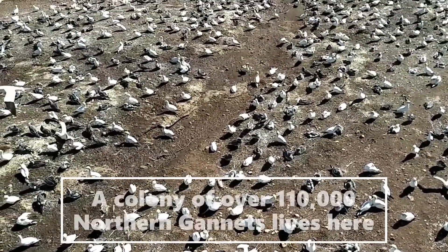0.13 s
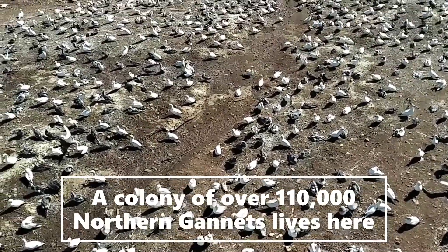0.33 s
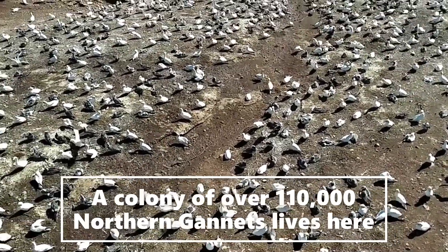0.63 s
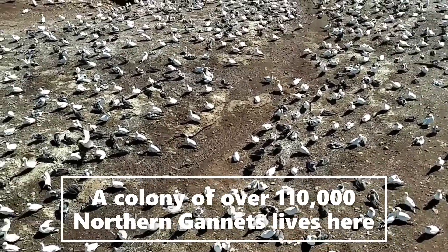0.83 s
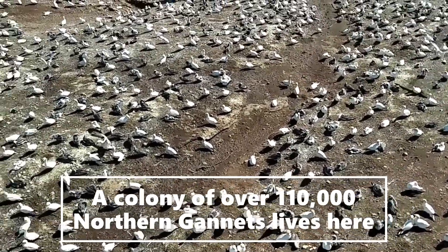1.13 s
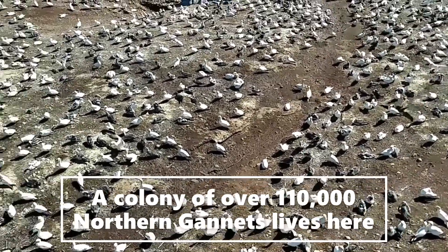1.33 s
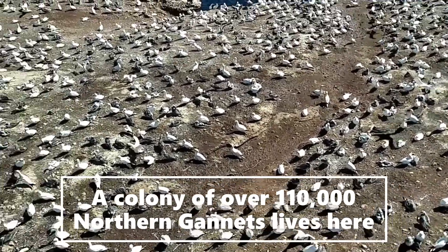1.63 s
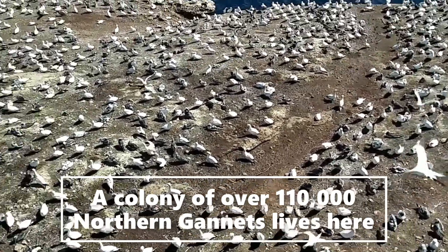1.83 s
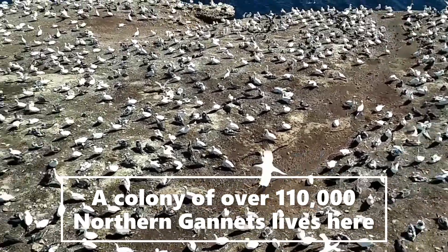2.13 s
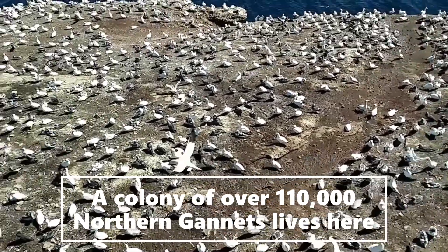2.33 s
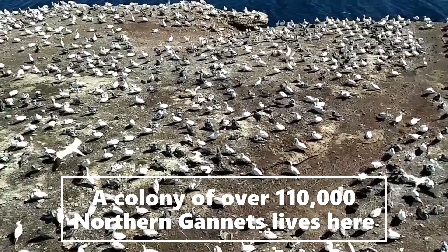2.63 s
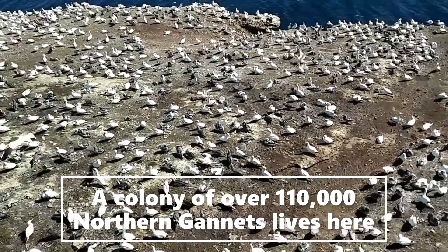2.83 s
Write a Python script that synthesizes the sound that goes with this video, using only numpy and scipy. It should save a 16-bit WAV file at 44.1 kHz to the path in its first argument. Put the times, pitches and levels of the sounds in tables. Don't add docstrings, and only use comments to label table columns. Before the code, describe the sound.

A huge seabird nesting colony calls in a dense, rasping, overlapping clamour with low wind rumble

```python
import sys
import numpy as np
from scipy import signal
from scipy.fft import rfft, irfft
from scipy.io import wavfile
from scipy.ndimage import uniform_filter1d, minimum_filter1d

SR = 44100
rng = np.random.default_rng(int(sys.argv[2]) if len(sys.argv) > 2 else 0)


def wav_record(signal):
    frames = np.transpose(np.atleast_2d(signal))
    bounded = np.clip(frames, -1, 1)
    quanta = np.round(bounded * 32767).astype(np.int16)
    wavfile.write(sys.argv[1], SR, quanta)


def ratio(d):
    e = np.asarray(d, float) / 20
    return 10 ** e


N = 131859

PITCH_HZ, ROLL_HZ, ROUGH = 410, 28.87, 0.16
UPPER_HZ = 3900

# [t/s, effort/dB, nearness of loudest callers/dB]
CROWD = [(0, -16, -17.5), (.1, -17.5, -19), (.17, -17.5, -21.5), (.58, -18, -23), (.78, -16, -21),
         (1.0, -18.5, -23.5), (1.16, -16, -19.5), (1.25, -17.5, -27.5), (1.38, -15, -23),
         (1.52, -16.5, -26), (1.66, -16, -19.5), (1.8, -17, -26.5), (2.0, -17.5, -17), (2.12, -19, -27),
         (2.23, -17, -19.5), (2.4, -19.5, -25), (2.68, -17.5, -20), (2.87, -20.5, -25)]
# [f/Hz, density/dB]
VOICE_SPECTRUM = [(480, -16.5), (940, -8), (1500, -5), (2000, 0), (2600, 0.5), (3300, -8), (4350, -14.5),
                  (5000, -32)]
# [f/Hz, density/dB]
RASP_SPECTRUM = [(2710, 4.5), (4600, 0), (5040, -0.5), (6530, -4), (9560, -14.5), (12600, -13.5),
                 (13700, -16.5), (15500, -28)]
CALLS_DB, WASH_DB, RASP_DB = -3, -2, 5.5


def colony():
    calls, rasp = callers()
    effort, near = ratio(curve(CROWD, 1)), ratio(curve(CROWD, 2))
    wash = colour(rng.standard_normal(N), VOICE_SPECTRUM)
    body = ratio(WASH_DB) * wash + ratio(CALLS_DB) * colour(calls, VOICE_SPECTRUM)
    hiss = colour(0.5 * rng.standard_normal(N) + 0.27 * rasp, RASP_SPECTRUM)
    crowd = effort * in_step() * (body + ratio(RASP_DB) * near * hiss)
    return crowd + near_birds() + cries() + grit() + murmur()


CALL_S, CALL_SPREAD_DB = 0.22, 2.5
PITCH_SPREAD, ARCH = 0.17, 0.12
ROLL_SPREAD, ROLL_SHARP = 0.17, 2.84
THROAT_LOW_HZ, THROAT_HIGH_HZ, THROAT_WIDTH_HZ, RING_DB = 1800, 4400, 280, 7
BEAK_LOW_HZ, BEAK_HIGH_HZ, BEAK_WIDTH_HZ, BEAK_DB = 4800, 14000, 2000, -8


def callers(count=120):
    body, rasp = np.zeros(N), np.zeros(N)
    u = np.linspace(0, 1, 9700)
    arch = np.sin(np.pi * u ** 0.8)
    for k, chances in enumerate(rng.random((count, 7))):
        when, roll_u, level_u, pitch_u, throat_u, phase, beak_u = chances
        roll_hz = ROLL_HZ * (1 + ROLL_SPREAD * (2 * roll_u - 1))
        roll = abs(np.sin(np.pi * (roll_hz * u * CALL_S + phase))) ** ROLL_SHARP
        shape = arch * roll * ratio(-CALL_SPREAD_DB * np.log(1 - 0.9 * level_u))
        pitch_hz = PITCH_HZ * (1 + PITCH_SPREAD * (2 * pitch_u - 1))
        drive = voice(pitch_hz * (1 - ARCH + ARCH * arch), ROUGH)
        throat_hz = THROAT_LOW_HZ * (THROAT_HIGH_HZ / THROAT_LOW_HZ) ** throat_u
        throat = ring(drive, throat_hz, THROAT_WIDTH_HZ)
        beak_hz = BEAK_LOW_HZ + (BEAK_HIGH_HZ - BEAK_LOW_HZ) * beak_u
        beak = ring(drive, beak_hz, BEAK_WIDTH_HZ)
        s = (k + when) / count * (N / SR + CALL_S) - CALL_S
        add(body, s, shape * scattered(drive + ratio(RING_DB - 17.5) * throat))
        add(rasp, s, shape ** 4.5 * scattered(drive + ratio(BEAK_DB) * beak))
    return evened(body), evened(rasp)


def near_birds():
    tone, edge = near_throbs()
    tone = tone + pipes()
    soft = signal.butter(4, 4700, fs=SR, output="sos")
    tone = 0.2 * tone + 0.65 * signal.sosfiltfilt(soft, tone)
    return tone + squeaks() + edge


# [t/s, peak level/dB, throat f/Hz]
THROBS = [(0.043, 3, 2970), (0.191, -6, 2280), (0.2174, -0.5, 2336), (0.2918, 0, 2630), (0.3298, -7, 2570),
          (0.3589, 3.5, 2420), (0.398, 1.5, 2757), (0.4255, -1.5, 2217), (0.4531, 1.5, 2197),
          (0.4815, -3, 1870), (0.5409, -9, 2128), (0.5782, -3, 2686), (0.6172, -0.5, 2460),
          (0.6663, -2, 2680), (0.6872, 1, 2660), (0.7203, 2, 2938), (0.762, -18, 2780), (0.874, -21, 1910),
          (0.9053, -5, 2325), (0.9522, -8.5, 2470), (1.0126, -20, 2180), (1.041, 3, 2770), (1.12, -4, 2370),
          (1.1392, -13, 2440), (1.31, -19, 2050), (1.3429, -10, 2640), (1.4065, 1.5, 2016),
          (1.5489, -11, 2560), (1.5722, -15, 2650), (1.6046, -9, 2176), (1.6646, -25, 2530),
          (1.7453, 1, 2206), (1.7735, -17, 2540), (1.8125, -5, 2296), (1.8377, -20, 3400),
          (1.8896, -14, 1900), (1.9096, -10, 2224), (2.007, -13, 1890), (2.0439, -5, 3110),
          (2.0847, -13, 2540), (2.146, -10.5, 2890), (2.2039, -3, 1950), (2.264, -20, 2680),
          (2.2917, -6, 2800), (2.3266, -18, 2185), (2.397, -12, 2890), (2.4264, -15, 2130),
          (2.4592, 0.5, 2175), (2.4892, -1, 2640), (2.5302, -3, 2660), (2.56, -10, 2500),
          (2.592, -17, 2450), (2.6438, -1, 2597), (2.6732, -28, 2140), (2.768, -18, 2520),
          (2.798, -10, 2640), (2.831, -10, 1835), (2.8614, -15, 2040), (2.9023, 0, 2510), (2.9483, 3, 2620)]
NEAR_DB, UPPER_DB, EDGE_DB = -8, -9, -33
FALL_S, THROB_HOLD_S = 0.007, 0.0095


def near_throbs():
    out, edge = np.zeros((2, N))
    for s, db, hz in THROBS:
        pitch_hz = hz / round(hz / PITCH_HZ)
        drive = scattered(voice(pitch_hz * np.ones(3400), ROUGH))[400:]
        throat = ring(drive, hz, 71) + 0.64 * ring_twice(drive, 2520, 1060, 1060)
        tone = throat + ratio(UPPER_DB) * ring_twice(drive, UPPER_HZ, 470, 470)
        add(out, s, ratio(db + NEAR_DB - 8.5) * burst(FALL_S, THROB_HOLD_S) * tone)
        add(edge, s, ratio(2.3 * db) * burst(0.003, 0.004) * evened(drive))
    return out, ratio(EDGE_DB - 26) * colour(edge, RASP_SPECTRUM)


IN_STEP_DB = 2


def in_step():
    beat = np.zeros(N)
    for s, db, hz in THROBS:
        add(beat, s, burst(FALL_S, THROB_HOLD_S))
    return evened(ratio(IN_STEP_DB * np.minimum(beat, 1)))


# [t/s, peak level/dB, f/Hz]
PIPES = [(0.0144, -0.5, 3700), (0.0433, -12, 3770), (0.0747, 0.5, 3334), (0.194, -12, 3720),
         (0.2199, -6, 3810), (0.2907, -21, 3720), (0.3316, -4, 3880), (0.3636, -5, 3430),
         (0.4234, -14, 3920), (0.4509, -6, 4150), (0.5417, -12, 3670), (0.5786, -26, 3850),
         (0.6604, -7, 3280), (0.7213, -10, 3500), (0.7811, -4, 4200), (0.9028, -8, 3840), (1.073, -6, 3550),
         (1.1079, -14, 3470), (1.1383, -1.5, 3710), (1.2785, -16, 3250), (1.3104, -27, 3230),
         (1.4072, -7.5, 3760), (1.4765, 1, 3697), (1.5718, -6, 3230), (1.7379, -2.5, 3620),
         (1.8377, -3, 3404), (2.166, -9, 3580), (2.2039, -26, 3320), (2.4937, -10, 3280),
         (2.5626, -19, 3250), (2.6993, -6, 3930), (2.9392, -12, 3920)]
# [t/s, peak level/dB, f/Hz]
TOP_PIPES = [
    (1.1423, -26, 4230),
    (1.1694, -2, 4370),
    (1.4074, -3, 4300),
    (1.4344, -6, 4320),
    (1.4735, -7, 4370),
]
PIPE_HOLD_S, PIPE_DB, PIPE_WIDTH_HZ = 0.0082, -16, 50


def pipes():
    out = np.zeros(N)
    for s, db, hz in PIPES + TOP_PIPES:
        pipe = ring_twice(rng.standard_normal(3000), hz, PIPE_WIDTH_HZ, 400)
        add(out, s, ratio(db + PIPE_DB) * burst(0.012, PIPE_HOLD_S) * pipe)
    return out


# [t/s, peak level/dB, f/Hz]
SQUEAKS = [(0.0468, -39, 11600), (0.156, -27, 12900), (0.3311, -24, 13600), (0.3626, -25, 11600),
           (0.587, -18, 12200), (0.8205, -22, 12100), (1.0665, -27, 12400), (1.1408, -35.5, 12400),
           (1.3733, -26, 12700), (1.5618, -27, 10000), (1.67, -25, 13000), (1.7415, -22, 12600),
           (1.748, -20, 8500), (2.008, -24, 10500), (2.018, -23, 11500), (.666, -23, 9100),
           (1.9385, -19, 10300), (1.9719, -22, 11200), (2.1665, -26, 11900), (2.2029, -22, 12200),
           (2.9597, -26, 12500)]
PUFF_DB = -3


def squeaks():
    out = np.zeros(N)
    for s, db, hz in SQUEAKS:
        puff = ring_twice(rng.standard_normal(3000), hz, 2400, 2400)
        add(out, s, ratio(db + PUFF_DB - 11) * burst(0.0041, 0.0021) * puff)
    return out


# [t/s, length/s, level/dB, pitch f/Hz]
CRIES = [(0, 0.038, -14.5, 438), (.04, 0.096, -17, 432.5), (.21, 0.082, -15, 443), (.4, 0.097, -16, 388.6),
         (.74, 0.095, -16.5, 409.3), (.86, .12, -20.5, 364.7), (1.07, 0.15, -16, 411),
         (1.39, 0.12, -25, 403), (1.56, .1, -23.5, 394), (1.66, 0.086, -16, 399.5),
         (1.88, 0.108, -19.5, 409.4), (2.0, .07, -22.5, 384.3), (2.2, .12, -18.5, 417),
         (2.66, .13, -17, 417), (2.96, 0.041, -18, 438)]
SAG, CRY_ROUGH, CRY_ROLL = 0.08, 0.1, 0.6


def cries():
    out = np.zeros(N)
    for s, length_s, db, hz in CRIES:
        u = np.linspace(0, 1, round(length_s * SR))
        roll = 1 - CRY_ROLL * np.cos(np.pi * ROLL_HZ * u * length_s) ** 2
        shape = abs(np.sin(np.pi * u)) ** 0.21 * roll
        add(out, s, ratio(db) * shape * scattered(voice(hz * (1 + SAG * (0.5 - u)), CRY_ROUGH)))
    level = np.std(out)
    return level * colour(out + 0.88 * level * ring(out, UPPER_HZ, 1140), VOICE_SPECTRUM)


GRIT_PER_S, GRIT_DB = 680, -44.5


def grit():
    clumps = np.maximum(evened(uniform_filter1d(rng.standard_normal(N), size=1200)), 0) ** 2
    size_db = 6.3 * np.minimum(rng.exponential(1, N), 4)
    ticks = (rng.random(N) < clumps * GRIT_PER_S / SR) * ratio(size_db)
    return ratio(GRIT_DB) * colour(scattered(ticks), RASP_SPECTRUM)


MURMUR_HZ, MURMUR_DB = 399, -40.5


def murmur():
    return ratio(MURMUR_DB) * ring_twice(rng.standard_normal(N), MURMUR_HZ, 80, 80)


# [t/s, level/dB]
GUSTS = [(0, -36.5), (.3, -45.5), (.52, -38), (.66, -34), (.8, -35), (1.15, -43), (1.35, -31), (1.47, -44),
         (1.6, -39), (1.66, -61), (1.8, -45), (1.88, -33), (2.3, -33.5), (2.45, -31.5), (2.66, -38.5),
         (2.8, -33.5), (2.99, -35.5)]
# [f/Hz, density/dB]
WIND_SPECTRUM = [(12, -57), (20, -31), (32, -31), (67, -2.5), (118, -1.5), (318, -3), (407, -6.5),
                 (520, -21), (680, -13), (1140, -120)]
LUMP_S, LUMP_DB = 0.087, 1.5


def wind():
    slow = uniform_filter1d(rng.standard_normal(N), round(LUMP_S * SR))
    lumps = evened(uniform_filter1d(slow, 600))
    return ratio(curve(GUSTS, 1) + LUMP_DB * lumps) * colour(rng.standard_normal(N), WIND_SPECTRUM)


# [t/s, peak level/dB, f/Hz]
BUFFETS = [(0.329, -31, 294), (0.484, -24, 211), (0.707, -20.5, 217), (0.778, -20, 189),
           (0.816, -26.5, 162), (0.95, -21, 266), (1.027, -19.5, 118.5), (1.051, -23.5, 324),
           (1.098, -24.5, 107), (1.187, -27.5, 240), (1.28, -37, 127), (1.535, -24.5, 163),
           (1.906, -21.5, 120), (1.957, -24, 256), (2.095, -16, 186), (2.13, -21.5, 212),
           (2.384, -22.5, 108), (2.469, -21, 313), (2.739, -27, 143), (2.794, -25, 135)]
BUFFET_S, BUFFET_DB = 0.024, -5


def buffets():
    out = np.zeros(N)
    t = np.arange(3000) / SR / BUFFET_S
    for s, db, hz in BUFFETS:
        eddy = ring_twice(rng.standard_normal(6000), hz, 90, 350)
        thud = ring_twice(rng.standard_normal(6000), 92, 123, 123)
        settled = (eddy + 0.58 * thud)[3000:]
        add(out, s, ratio(db + BUFFET_DB) * t * np.exp(1 - t ** 2) * settled)
    return out


# [f/Hz, density/dB]
SURF_SPECTRUM = [(170, -30), (230, -6), (300, -1), (410, 0), (500, -9), (640, -9), (800, -14), (1100, -40)]
SURF_DB = -39


def surf():
    return ratio(SURF_DB) * colour(rng.standard_normal(N), SURF_SPECTRUM)


JITTER, WANDER = 0.13, 1.2


def voice(pitch_hz, rough):
    fast, slow = rng.standard_normal((2, len(pitch_hz)))
    unsteady = JITTER * uniform_filter1d(fast, size=60) + WANDER * uniform_filter1d(slow, size=1500)
    turns = np.cumsum(pitch_hz * (1 + unsteady)) / SR
    pulses = evened(np.diff(np.floor(turns), prepend=0))
    return (1 - rough) * pulses + rough * rng.standard_normal(len(turns))


def ring(x, hz, width_hz):
    r = np.exp(-np.pi * width_hz / SR)
    return evened(signal.lfilter([1, 0, -1], [1, -2 * r * np.cos(2 * np.pi * hz / SR), r * r], x))


def ring_twice(x, hz, first_width_hz, second_width_hz):
    return ring(ring(x, hz, first_width_hz), hz, second_width_hz)


def burst(fall_s, hold_s):
    t = np.arange(3000) / SR
    return (1 - np.exp(-t / 0.001)) * np.exp(-np.maximum(t - hold_s, 0) / fall_s)


def scattered(x):
    k = np.arange(400)
    echoes = rng.standard_normal(400) * np.exp(-k / 90) + 3 * (k == 0)
    return signal.oaconvolve(x, evened(echoes) / 20)[:len(x)]


def evened(x):
    return x / np.sqrt(np.mean(x ** 2) + 1e-20)


def curve(rows, column):
    rows = np.array(rows)
    return np.interp(np.arange(N) / SR, rows[:, 0], rows[:, column])


def colour(x, points):
    f, db = np.transpose(points)
    hz = np.fft.rfftfreq(N, 1 / SR)
    gain = ratio(np.interp(np.log(hz + 1), np.log(f + 1), db, -90, -90))
    return evened(irfft(rfft(x) * gain, N))


def add(mix, s, sound):
    at = round(s * SR)
    part = mix[max(at, 0):max(at + len(sound), 0)]
    part += sound[max(-at, 0):][:len(part)]


def scene():
    return (colony() + wind() + buffets() + surf())[None]


# [t/s, depth level/dB]
DROPS = [
    (.139, -22),
    (.603, -12),
    (1.057, -20),
    (1.719, -24),
    (1.762, -26),
    (1.953, -26),
    (2.381, -24),
    (2.593, -22),
    (2.722, -24),
]
DROP_S, KEEP_DB, KEEP_OVER_DB = 0.027, -18, 10


def starve(x):
    size, out = round(DROP_S * SR), x.copy()
    window = np.sin(np.pi * np.arange(size) / size)
    for s, db in DROPS:
        lines = rfft(window * x[round((s - DROP_S / 2) * SR):][:size])
        size_of = abs(lines)
        near_top = ratio(KEEP_DB) * size_of.max()
        above_neighbours = ratio(KEEP_OVER_DB) * uniform_filter1d(size_of, size=40)
        weak = size_of < np.minimum(near_top, above_neighbours)
        add(out, s - DROP_S / 2, (ratio(db) - 1) * window * irfft(lines * weak, size))
    return out


def roll_off(x):
    return signal.sosfilt(signal.butter(12, 15630, fs=SR, output="sos"), x)


MIC_HZ, CEILING = 58.7, 0.86


def record(dry):
    bass_cut = signal.butter(2, MIC_HZ, "high", fs=SR, output="sos")
    blinked = starve(signal.sosfilt(bass_cut, dry[0]))[None]
    peak = uniform_filter1d(-minimum_filter1d(-abs(blinked), size=200), size=200)
    return roll_off(blinked * np.minimum(CEILING / peak, 1))


dry = scene()
out = record(dry)
wav_record(out)
```